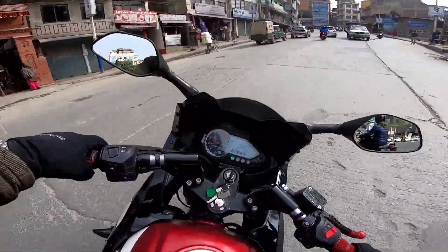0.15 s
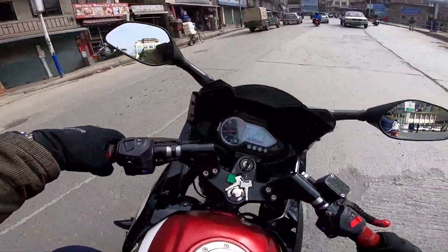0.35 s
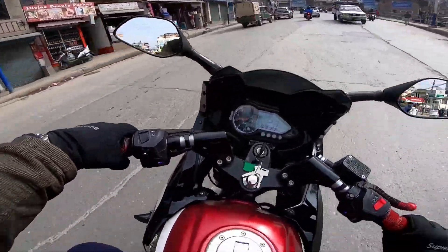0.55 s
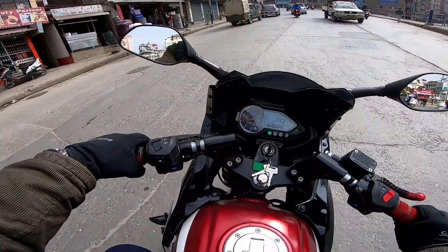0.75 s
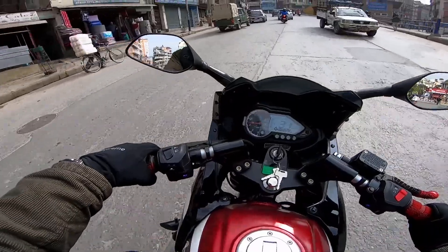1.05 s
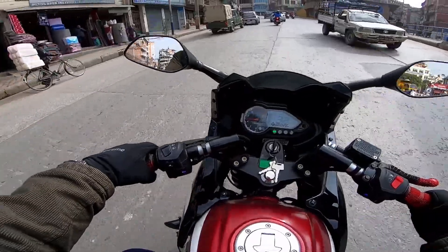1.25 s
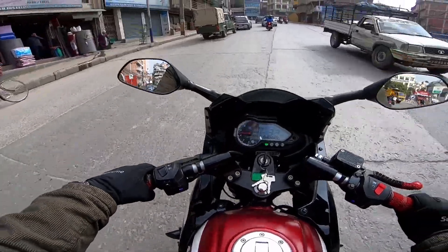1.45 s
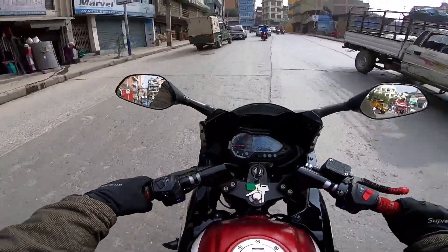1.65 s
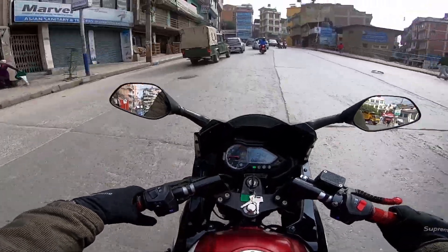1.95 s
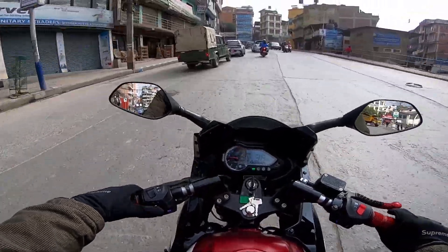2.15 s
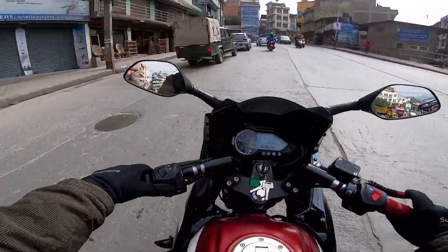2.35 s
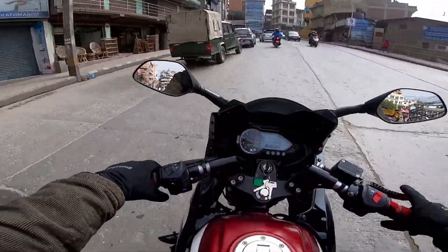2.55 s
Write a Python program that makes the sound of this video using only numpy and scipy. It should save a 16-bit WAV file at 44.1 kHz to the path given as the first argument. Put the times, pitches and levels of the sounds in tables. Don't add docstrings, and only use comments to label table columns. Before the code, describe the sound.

A single-cylinder motorcycle engine dominates, a buzzing, throaty drone with valve clatter, rising in pitch from 0 to about 2.4 seconds, with a quick flare near 0.5. Keys jingle mostly at 0.3-0.5, faintly at 1.4 and 2.3-2.4. Plastic ticks cluster near 0.3, 0.9, 2.0 and 2.6. Traffic roar, tyre hiss and low wind continue. Throttle shuts briefly around 2.6. Close, nearly mono, limited.

```python
import sys
import numpy as np
from scipy import signal
from scipy.fft import rfft, irfft, next_fast_len
from scipy.io import wavfile
from scipy.ndimage import uniform_filter1d, map_coordinates

SR = 44100
rng = np.random.default_rng(int(sys.argv[2]) if len(sys.argv) > 2 else 0)


def invert_db(x):
    u = np.asarray(x, float) / 20
    return 10 ** u


def unload_wav(signal):
    wavfile.write(
        sys.argv[1],
        SR,
        np.round(np.clip(np.atleast_2d(signal).T, -1, 1) * 32767).astype(np.int16),
    )


N = 119070


def unit(x):
    return x / np.sqrt(np.mean(x ** 2) + 1e-20)


def along(points, hz):
    f, v = np.transpose(points)
    return np.interp(np.log(hz + 1), np.log(f + 1), v)


def curves(rows):
    s, *cols = np.transpose(rows)
    return [np.interp(np.arange(N) / SR, s, c) for c in cols]


def wobble(rate):
    return map_coordinates(rng.standard_normal(400), [np.arange(N) * rate / SR], mode="wrap")


def filtered(x, response):
    m = next_fast_len(N + SR // 2)
    return irfft(rfft(x, m) * response(np.fft.rfftfreq(m, 1 / SR)), m)[..., :N]


def rush(spectrum, patchy_db):
    z = signal.stft(rng.standard_normal(N + 512), nperseg=512)[2]
    field = uniform_filter1d(rng.standard_normal(z.shape), size=10, axis=1)
    field = uniform_filter1d(field, size=6, axis=0)
    gain = invert_db(patchy_db * unit(field).clip(-2, 2))
    x = signal.istft(z * gain, nperseg=512)[1][:N]
    lowest_hz = spectrum[0][0]
    return unit(filtered(x, lambda hz: invert_db(along(spectrum, hz)) * (hz >= lowest_hz)))


# t/s, level/dB
TRAFFIC = [(0, -32), (.13, -30.5), (.25, -27.5), (.38, -31), (.46, -28), (.52, -25.5), (.58, -31),
           (.95, -30.5), (1.02, -34.5), (1.05, -27), (1.12, -28), (1.3, -28.5), (1.6, -27.5), (1.8, -29),
           (2.3, -28.5), (2.55, -31), (2.7, -33.5)]
# f/Hz, level/dB (per Hz)
ROAR_COLOUR = [(200, -64), (350, 5), (520, 2.5), (760, -9), (1300, -7.5), (1680, -14), (1900, -18.5),
               (12000, -65.5)]
# f/Hz, level/dB (per Hz)
HISS_COLOUR = [(1500, -120), (2300, -0.5), (3200, -5), (4600, -4.5), (8000, -12.5), (12000, -23),
               (15800, -44)]
# f/Hz, level/dB (per Hz)
WIND_COLOUR = [(8, -12), (24, -3), (38, 0), (52, -9), (120, -15), (300, -22), (500, -31), (900, -120)]


def street():
    level_db, = curves(TRAFFIC)
    roar_db = level_db + 5 + 0.57 * wobble(8.43)
    roar = invert_db(roar_db) * rush(ROAR_COLOUR, patchy_db=0.82)
    hiss_db = -49.5 + 0.27 * (level_db - level_db.mean())
    hiss_db = hiss_db + 1.2 * wobble(1.9) + 1.5 * wobble(30.3)
    hiss = invert_db(hiss_db) * rush(HISS_COLOUR, patchy_db=-1.0)
    fade_db = 0.8 * np.arange(N) / SR
    wind = invert_db(-22 - fade_db + 1.8 * wobble(5.1)) * rush(WIND_COLOUR, patchy_db=1)
    return roar + hiss + wind


# t/s, level/dB (peak of the tick), level/dB (rattle after it)
BUMPS = [(.1, -51, -53), (0.209, -47.5, -54), (.257, -34, -55.5), (0.293, -53, -44), (.307, -40.5, -49.5),
         (0.439, -42, -46), (.456, -42, -50.5), (.66, -61, -48), (0.728, -45, -58.5), (0.863, -37.5, -54),
         (0.878, -31, -55), (0.893, -45, -66), (0.9, -42, -58), (0.904, -33.5, -53.5), (2.005, -37.5, -49),
         (2.02, -32, -56.5), (2.051, -31, -62), (2.062, -34, -63.5), (2.329, -48, -53.5), (2.42, -54, -56),
         (2.578, -32.5, -62), (2.588, -36, -48.5), (2.697, -46, -60.5)]
# f/Hz, level/dB (per Hz)
TICK_COLOUR = [(2500, -120), (4000, 2), (6000, 1.5), (10000, -3), (15800, -11)]
# f/Hz, level/dB (per Hz)
RATTLE_COLOUR = [(1200, -120), (2000, -2.5), (4500, -9.5), (9000, -16.5), (13500, -25), (15800, -34.5)]


def ticks():
    tick_t60_s, rattle_t60_s, rattle_rise_s = 0.0072, 0.18, 0.0057
    snap, rattle = np.zeros(N + SR), np.zeros(N + SR)
    t = np.arange(SR // 4) / SR
    for s, tick_db, rattle_db in BUMPS:
        here = slice(round(s * SR), round(s * SR) + len(t))
        snap[here] += invert_db(tick_db - 2.5 - 60 * t / tick_t60_s)
        rattle[here] += invert_db(rattle_db - 60 * t / rattle_t60_s) * (1 - np.exp(-t / rattle_rise_s))
    snap = snap[:N] * rush(TICK_COLOUR, patchy_db=.8)
    rattle = rattle[:N] * invert_db(4.5 * wobble(120)) * rush(RATTLE_COLOUR, patchy_db=3)
    return snap + rattle


# f/Hz, t/s (to fall 60 dB)
KEY_TONES = [(8280, .075), (9780, 0.165), (11320, 0.12), (12730, .055)]
# t/s, then level/dB of each ringing tone
JINGLES = [(.272, -53, -97, -65, -94), (.296, -52, -64, -49, -92.5), (.312, -59, -77, -60, -71.5),
           (.329, -71, -90, -47.5, -61), (.349, -55, -60, -66.5, -91.5), (.435, -55, -93, -65, -92.5),
           (0.447, -54, -70, -58, -93), (0.46, -66, -93, -62, -90), (.472, -82, -90, -53, -96),
           (.505, -87, -102, -59, -97), (.53, -93, -89, -62, -93), (.565, -90, -92, -61, -90),
           (1.25, -86, -100, -60, -91), (1.39, -53, -87, -67, -96), (2.311, -54, -72, -62, -62),
           (2.399, -65, -97, -68, -99), (2.425, -49, -97, -84, -96)]


def keys():
    out, t = np.zeros(N + SR), np.arange(SR // 4) / SR
    luck = rng.standard_normal((len(JINGLES), len(KEY_TONES)))
    rise = 1 - np.exp(-t / .002)
    for (s, *levels), row in zip(JINGLES, luck):
        here = slice(round(s * SR), round(s * SR) + len(t))
        for db, (hz, t60_s), r in zip(levels, KEY_TONES, row):
            tone = np.sin(2 * np.pi * hz * (1 + 0.0044 * r) * t)
            out[here] += rise * invert_db(db + 5.5 - 60 * t / t60_s) * tone
    jingle = out[:N] * invert_db(3.7 * wobble(140))

    shiver, width_hz = np.zeros(N), 60
    for db, (hz, _) in zip([-76, -89.5, -77, -98], KEY_TONES):
        noise = rng.standard_normal(N)
        band = unit(filtered(noise, lambda f: 1 / (1 + ((f - hz) / width_hz) ** 2)))
        shiver += invert_db(db + 3.5 * wobble(25)) * band
    return jingle + shiver


# f/Hz, level/dB (per Hz)
CLATTER_COLOUR = [(500, -120), (750, 9), (1200, -0.5), (1650, -10.5), (2200, -7.5), (4500, -24),
                  (9000, -36.5), (16000, -66)]


def clatter(cycle, swing_db):
    sharp = 4.6
    bursts = np.exp(-sharp * (cycle % 1))
    bursts = bursts + .5 * np.exp(-sharp * 2 * ((2 * cycle + 0.13) % 1))
    bursts = uniform_filter1d(bursts, size=60) * invert_db(3.1 * wobble(60))
    return invert_db(-41.5 + 0.17 * swing_db) * unit(bursts * rush(CLATTER_COLOUR, patchy_db=5.5))


# f/Hz, t/ms late
ARRIVAL = [(70, 0), (110, 8.1), (160, 13.2), (220, -7.1), (270, 11), (310, 10.5), (350, 20.4), (480, 23.8)]


def in_step(hz):
    grid = np.arange(1, 6000)
    phase = -2.34 - 2 * np.pi * np.cumsum(along(ARRIVAL, grid)) / 1000
    return np.interp(hz, grid, phase)


# multiple of firing rate, level/dB (rms), f/Hz (firing rate where strongest),
# f/Hz (span of firing rate that sets how fast it weakens)
SHAKE = [(1, -25.5, 16, 4), (2, -17, 43, 8.5), (3, -24.5, 36.26, 1.5), (4, -25.5, 34.67, 1.43),
         (4, -20.5, 52, 3.5), (6, -23.5, 46.76, 3), (7, -20.5, 38.85, 2), (8, -14, 58.5, 5),
         (8, -24, 38.44, 1.5), (9, -19, 34.87, 2.34), (12, -27, 40.8, 2.2), (16, -41.5, 45, 3.5),
         (4, -24, 40.2, 1), (5, -28, 46.5, 2), (11, -34, 44, 3), (12, -29, 43.2, 1.1), (14, -35, 40.2, 1),
         (26, -42, 40.3, .5)]


def shake(rate, cycle, swing_db):
    t = np.arange(N) / SR
    slip_s, slip_lasts_s = .455, .025
    slip_db = 8 * np.exp(-((t - slip_s) / slip_lasts_s) ** 2)
    throttle_shut_s, fall_db_per_s, fall_s = 2.565, 450, .04
    out = np.zeros(N)
    for order, db, best_hz, span_hz in SHAKE:
        level_db = db + 3.5 - 1.95 * ((rate - best_hz) / span_hz) ** 2 + 1.2 * wobble(9)
        if order not in (4, 8, 16):
            level_db = level_db - fall_db_per_s * np.clip(t - throttle_shut_s - 0.15 / order, 0, fall_s)
        if order > 7:
            level_db = level_db - slip_db
        drift_rad = .3 * wobble(10.0)
        out += invert_db(level_db) * np.cos(2 * np.pi * order * cycle + in_step(order * rate) + drift_rad)
    return invert_db(0.05 * swing_db) * out


# f/Hz, f/Hz (width), level/dB
PIPE = [(126, 140, -6.5), (283.5, 26.7, 4.5), (319.5, 40.7, -0.5), (404.5, 20, -3.5), (466, 81, -7),
        (662, 140, -28.5)]


def pipe(f):
    total = 0
    for n, (centre, width, db) in enumerate(PIPE):
        resonance = 1j * f * width / (centre * centre - f * f + 1j * f * width)
        total = total + (-1) ** n * invert_db(db) * resonance
    muffler_hz = 844
    return total / (1 + 1j * f / muffler_hz) ** 4


def exhaust(cycle, load_db):
    size_db, jitter, noise_share = 1.2, .004, .12
    k = np.arange(160)
    luck = rng.standard_normal((160, 4))
    puffs = np.zeros(N + 1)
    for place, size, col in ((0, 1, 0), (.5, 0.062, 2)):
        moments = k + place + jitter * luck[:, col]
        at = np.interp(moments, cycle, np.arange(N), left=N, right=N).astype(int)
        puffs += np.bincount(at, size * invert_db(size_db * luck[:, col + 1]), N + 1)
    gate = np.exp(-6 * (cycle % 1))
    drive = unit(puffs[:N]) + noise_share * unit(gate * rng.standard_normal(N))
    ringing = filtered(drive, lambda f: np.abs(pipe(f)) * np.exp(1j * in_step(f)))
    return invert_db(load_db - 3.5) * unit(ringing)


# t/s, f/Hz (firings per second)
SPEED = [(0.0, 32.2), (0.13, 34.0), (0.25, 35.3), (0.41, 35.7), (0.49, 39.6), (0.57, 36.9), (0.59, 36.6),
         (0.88, 38.0), (1.16, 39.9), (1.29, 40.4), (1.35, 40.4), (1.82, 43.1), (1.93, 43.9), (2.38, 46.3),
         (2.58, 46.2), (2.7, 46.0)]
# t/s, level/dB
LOAD = [(0, -16), (.04, -10.5), (.35, -17.5), (.52, -19), (.58, -16.5), (1.2, -21.5), (1.86, -17),
        (2.55, -16.5), (2.585, -11), (2.62, -31), (2.7, -15)]


def engine():
    (rate,), (load_db,) = curves(SPEED), curves(LOAD)
    cycle = np.cumsum(rate) / SR - .07
    swing_db = load_db - load_db.mean()
    return exhaust(cycle, load_db) + shake(rate, cycle, swing_db) + clatter(cycle, swing_db)


# f/Hz, level/dB (side over middle)
APART = [(60, -56), (200, -40), (450, -33), (880, -17), (1200, -27), (2800, -23), (5500, -12), (14000, -3)]


def scene():
    small = ticks() + keys()
    mid = street() + small + engine()
    z = signal.stft(mid, nperseg=256)[2]
    scramble = np.exp(2j * np.pi * rng.random(z.shape))
    other = signal.istft(z * scramble, nperseg=256)[1][:N]
    side = filtered(other, lambda hz: invert_db(along(APART, hz))) + .1 * small
    return np.array([mid + side, mid - side])


def top_cut(x):
    return signal.sosfilt(signal.butter(12, 15830, fs=SR, output="sos"), x)


def record(dry):
    ceiling, knee = 1.1, 5
    mix = dry / (1 + np.abs(dry / ceiling) ** knee) ** (1 / knee)
    return top_cut(mix)


dry = scene()
out = record(dry)
unload_wav(out)
```